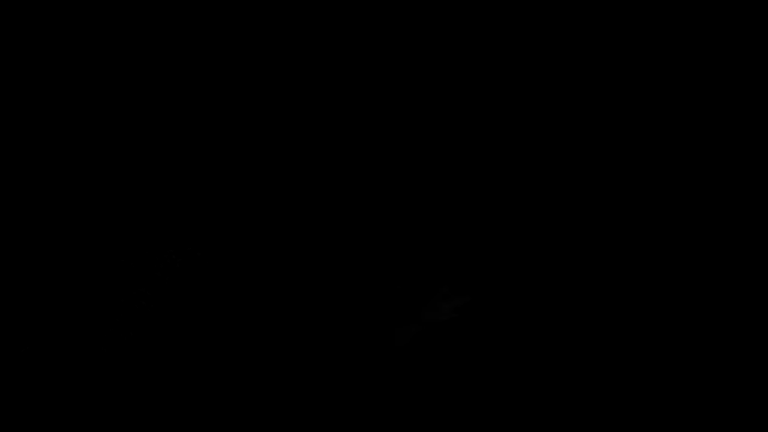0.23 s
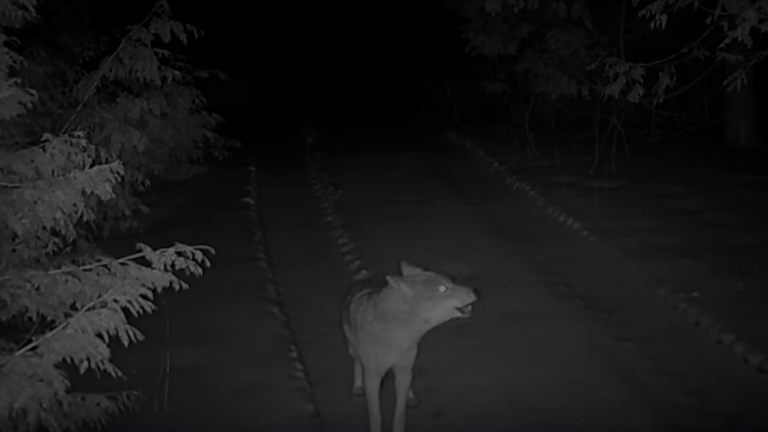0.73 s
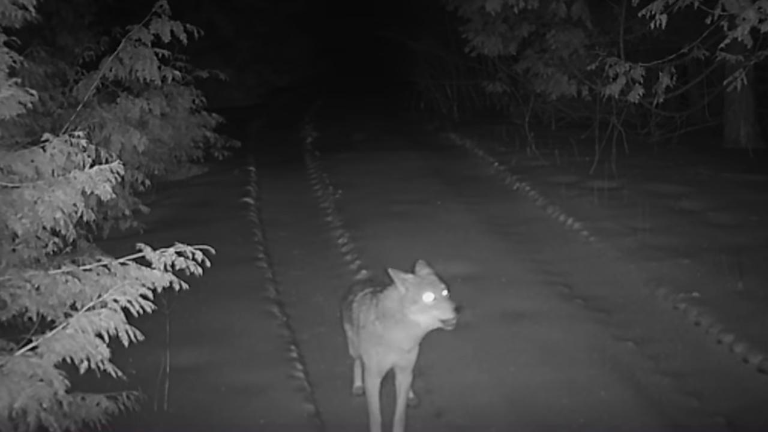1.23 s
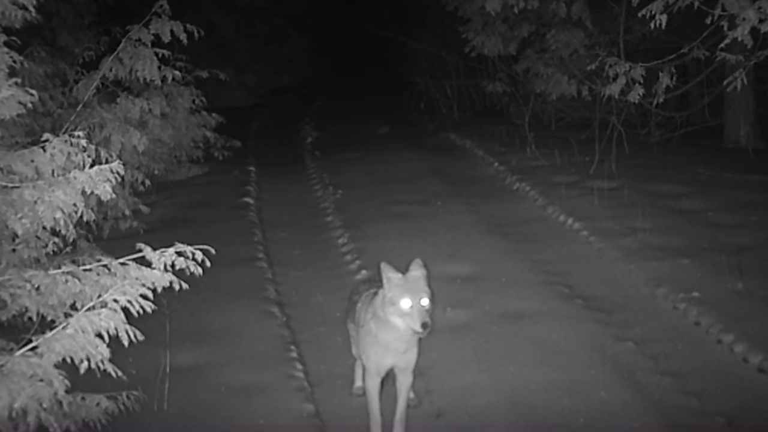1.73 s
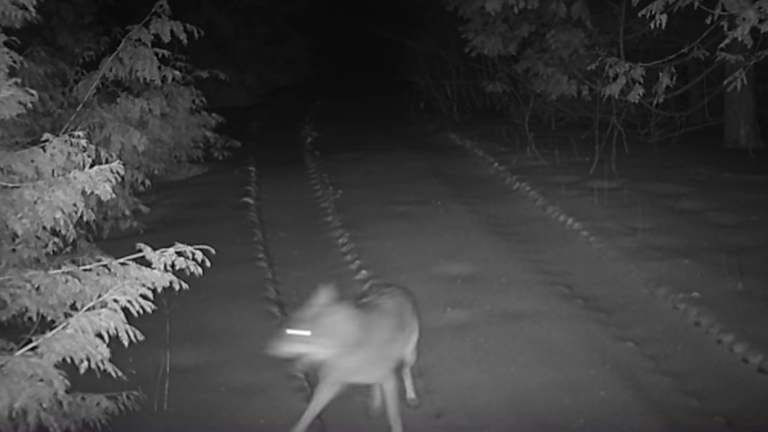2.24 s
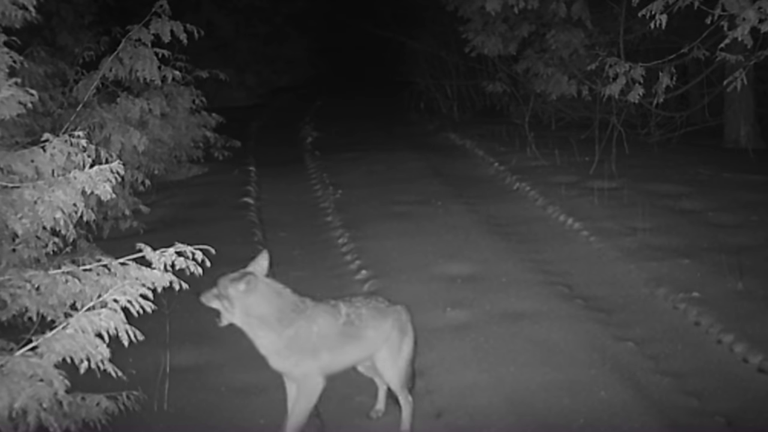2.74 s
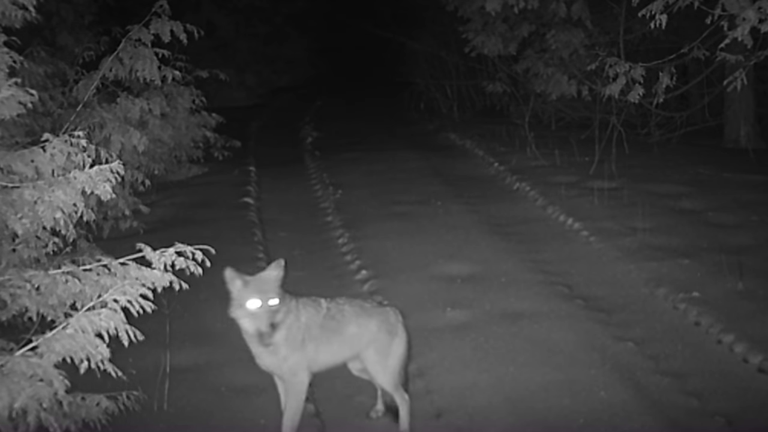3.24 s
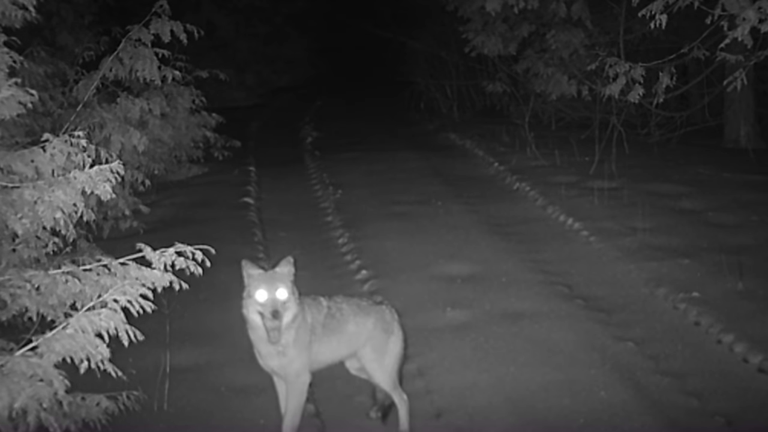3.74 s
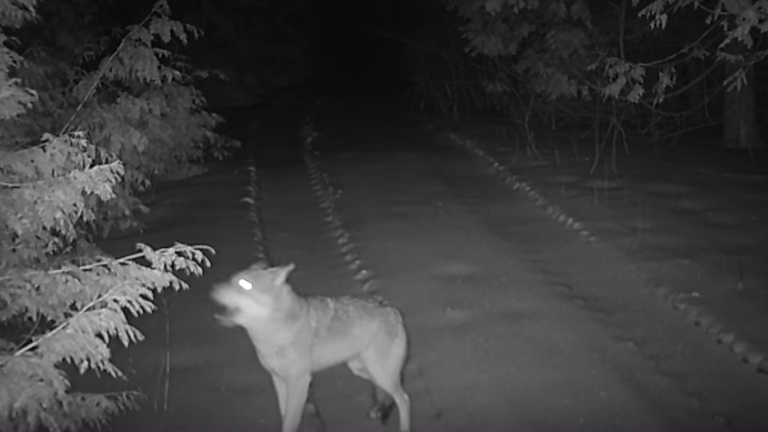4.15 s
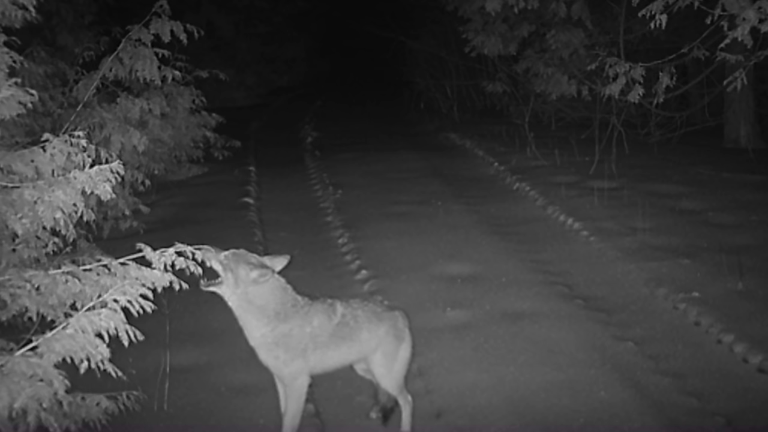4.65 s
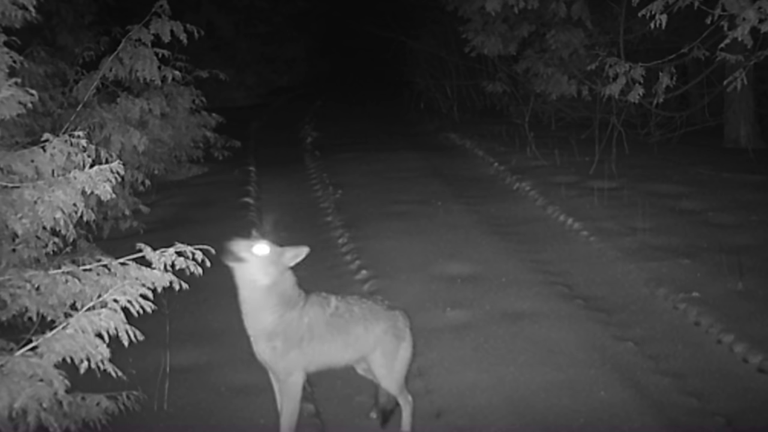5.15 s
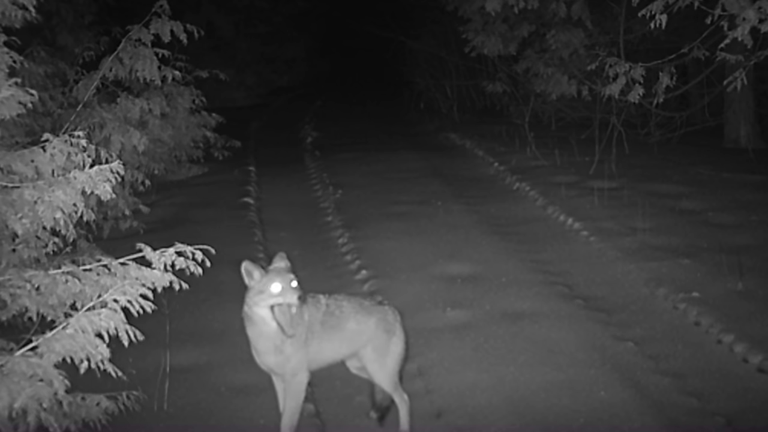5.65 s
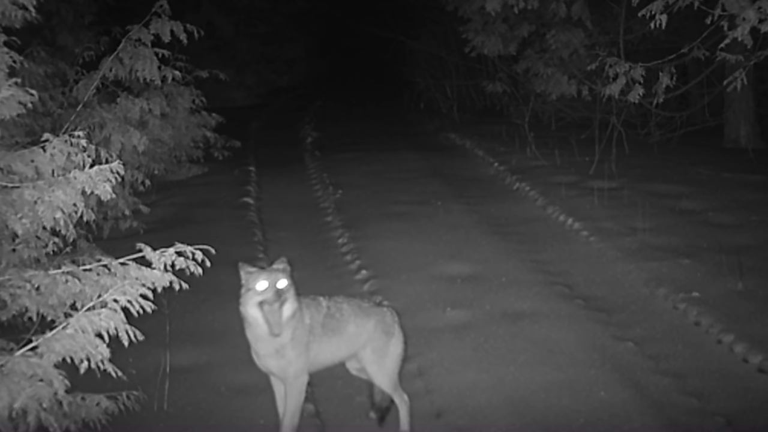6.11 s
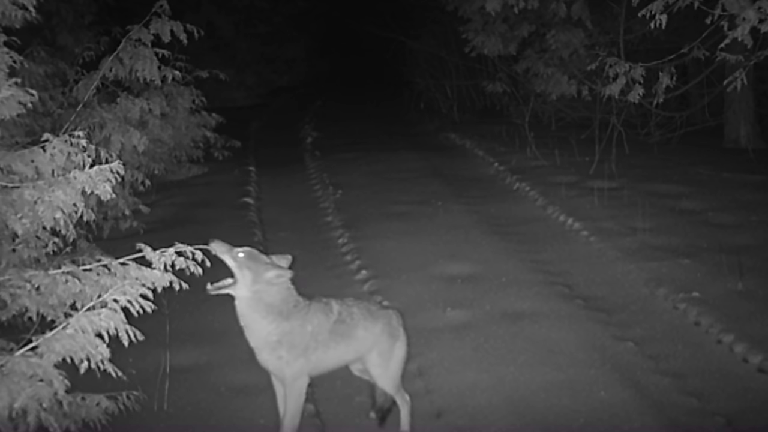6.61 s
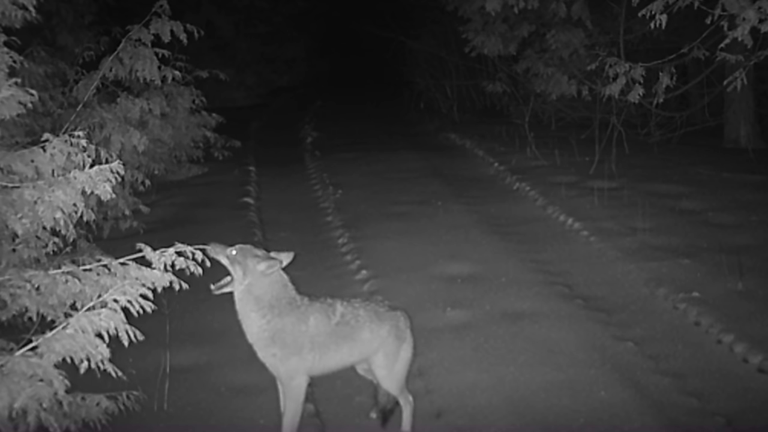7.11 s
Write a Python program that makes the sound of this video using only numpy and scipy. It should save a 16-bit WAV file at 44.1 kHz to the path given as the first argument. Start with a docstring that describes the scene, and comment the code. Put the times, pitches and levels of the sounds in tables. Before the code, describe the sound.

Several coyotes howl quietly some way off in the woods at night, their pitches gliding and overlapping above a faint steady hiss. The chorus thickens and swells with wails, short high yips, hoarse barks and rising whoops, the distant calls smeared by a short echo. Late on, a coyote near the microphone screams, loud and piercing with a thin whistling edge, and yelps once. The pack keeps yipping and barking behind it.

```python
"""Coyote pack, snowy forest at night.

One near animal screams with a second, whistling tone and drives a limiter; behind it the pack howls,
whoops, yodels, yips and barks. Each voice is a gliding stack of harmonics through throat resonances;
barks are uneven slaps of the vocal folds. Trunk echoes smear the far voices, over a faint hiss."""
import sys
import numpy as np
from scipy import signal
from scipy.fft import rfft, irfft
from scipy.io import wavfile
from scipy.ndimage import uniform_filter1d, minimum_filter1d

SR = 44100
rng = np.random.default_rng(int(sys.argv[2]) if len(sys.argv) > 2 else 0)


def to_wav(sig):
    """Store sig (one row per channel, or 1-D mono) as 16-bit WAV at the path in sys.argv[1].

    Samples outside -1..1 are clipped; the rate is SR.
    """
    pcm = np.clip(np.atleast_2d(sig), -1, 1) * 32767
    pcm = np.round(pcm).astype(np.int16)
    wavfile.write(sys.argv[1], SR, pcm.T)  # frames by channels


N = 325458
TIME_S = np.arange(N) / SR
TOP_HZ = 15700

# Call levels are before mix gains.
# Calls, moving mouth: (time [s], pitch [Hz], fundamental [dB], second harmonic [dB])
NEAR_SCREAM = [(5.205, 1604, -12, -24), (5.273, 1722, -26.5, -29), (5.441, 1679, -24.5, -28),
               (5.579, 1870, -26.5, -28), (5.701, 1688, -22, -26), (5.767, 1779, -27.5, -26.5),
               (5.857, 1654, -22.5, -24.5), (5.935, 1818, -25, -34), (5.989, 1853, -16, -19.5),
               (6.015, 1710, -24, -30), (6.04, 1365, -26, -52)]
WAIL_PHRASES = [
    [(0.024, 930, -68, -60), (0.038, 923, -59, -57), (0.358, 907, -59, -57.5), (0.722, 822.8, -56, -55),
     (0.76, 815.4, -69, -53)],
    [(2.76, 1069, -38, -48.5), (2.83, 979.1, -42, -43.5), (2.854, 938.2, -45, -36.5),
     (2.904, 815, -35, -31), (2.912, 880, -46, -37)],
    [(2.914, 910, -39, -31), (2.956, 895.5, -45, -26), (3.118, 793.5, -46.5, -26), (3.226, 799, -47, -27.5),
     (3.259, 780, -37, -33)],
]  # one list per register
WAIL_TAIL = [(3.26, 746.7, -37.5, -32.5), (3.432, 932.7, -36, -44.5), (3.638, 1001, -38.5, -52.5),
             (3.73, 836.4, -45.5, -32.5), (3.836, 688.8, -42, -42.5), (3.86, 617.5, -45, -48)]
HIGH_YODEL = [(1.97, 1042, -41.5, -43.5), (2.042, 1556, -38, -51.5), (2.09, 1648, -45.5, -52),
              (2.154, 1534, -32.5, -57), (2.282, 1736, -36.5, -43), (2.368, 1491, -46.5, -75),
              (2.386, 1342, -39, -61), (2.486, 1193, -41, -54), (2.756, 1324, -45, -54.5),
              (2.8, 1151, -47, -49)]
# Calls, steady mouth: (time [s], pitch [Hz], level [dB])
NEAR_YELP = [(6.233, 1270, -22.5), (6.26, 1600, -16), (6.285, 1798, -8), (6.342, 1704, -13),
             (6.38, 1540, -29)]
HELD_HOWL_A = [(0.024, 487, -51), (0.354, 498, -50.5), (0.602, 471.4, -57), (1.05, 486, -55.5),
               (1.394, 453, -63), (1.51, 453.2, -68)]
HELD_HOWL_B = [(2.2, 519, -54), (2.328, 526, -54), (2.418, 552, -58), (2.72, 519, -50.5)]
LOW_HOWL_HEAD = [(0.55, 497, -61.5), (0.71, 548.3, -47.5), (0.91, 478.4, -55), (1.15, 670, -40),
                 (1.3, 608.3, -37.5), (1.46, 655, -35), (1.62, 664.4, -35), (1.82, 538.2, -38.5),
                 (1.96, 549.7, -35.5), (2.11, 514, -42), (2.22, 450.4, -47.5), (2.55, 450.6, -48.5),
                 (2.61, 473.6, -43.5), (2.97, 438.4, -47)]
LOW_HOWL_TAIL = [(2.97, 510, -38.5), (3.21, 523, -37), (3.348, 657, -43), (3.83, 610, -49), (3.9, 609, -40)]  # after an upward voice break
SOFT_MOANS = [
    [(3.9, 586.5, -42.5), (4.15, 678.6, -46), (4.298, 619.8, -48.5), (4.412, 755.4, -60),
     (4.51, 731.9, -41), (4.548, 844.3, -48.5), (4.63, 814.8, -45.5)],
    [(6.05, 623.4, -55), (6.098, 596.9, -52), (6.2, 698.0, -49.5), (6.328, 564.7, -59),
     (6.402, 685.2, -40.5), (6.484, 821.6, -38), (6.56, 638.6, -58)],
]  # one list per moan
WHOOP_SHORT = [(4.72, 780, -30), (4.764, 1322, -24.5), (4.83, 1492, -33), (4.884, 1286, -35.5),
               (5.014, 1593, -22.5), (5.05, 1330, -27), (5.08, 900, -44)]
WHOOP_LONG = [(5.15, 1026, -26.5), (5.182, 1275, -18), (5.258, 1323, -19), (5.328, 1006, -34.5),
              (5.456, 1380, -12.5), (5.5, 1263, -19.5), (5.542, 916.6, -31.5), (5.758, 973, -31),
              (5.85, 815, -39), (6.02, 838, -44.5)]
WHOOP_HOARSE = [(6.88, 841.5, -30), (6.978, 1138, -25), (7.056, 918.8, -36), (7.122, 958.2, -33),
                (7.19, 1295, -27.5), (7.244, 1236, -28), (7.29, 693, -45.5)]
# Wavering howls: (start [s], length [s], first pitch [Hz], last pitch [Hz], slur [ratio], level [dB])
FAR_WARBLES = [(0.628, 1.77, 1422, 1295, 0.36, -52), (3.851, 1.3, 1438, 1298, 0.21, -44.5),
               (4.083, 0.21, 1274, 1327, 0.0046, -44.5), (6.372, 0.47, 1542, 1168, 0.0016, -45),
               (7.104, .28, 1455, 1481, 0.12, -44), (7.232, .15, 1183, 1235, 0.1, -43.5)]
# Yips: (start [s], length [s], top pitch [Hz], rise [ratio of top], level [dB], roughness [0-1])
FAR_YIPS = [(0.178, 0.11, 1431, 0.13, -44.5, 0.05), (2.928, 0.12, 1323, .1, -41.5, 0.07),
            (3.097, 0.17, 1360, .09, -42.5, .02), (3.27, 0.14, 1346, 0.077, -38, 0.15),
            (3.549, 0.16, 1341, 0.068, -35.5, 0.11), (3.694, 0.16, 1360, 0.051, -37.5, .07),
            (3.975, .23, 823, .28, -47.5, 0.15), (4.413, 0.12, 1303, 0.047, -33, .09),
            (4.695, 0.13, 1386, 0.033, -36, 0.06), (5.675, .17, 1321, 0.2, -35.5, 0.05),
            (5.977, .15, 1325, 0.18, -35, 0.27), (6.286, 0.13, 1287, 0.13, -35, 0.25),
            (6.454, .15, 1322, 0.18, -38, 0.35), (6.719, .11, 1282, 0.082, -34.5, 0.17),
            (6.943, 0.12, 1466, .23, -30.5, 0.22)]
# Barks: (start [s], length [s], first [Hz], middle [Hz], last [Hz], level [dB], roughness [0-1])
FAR_BARKS = [(.46, 0.15, 290, 501, 548, -56, 0.88), (4.051, 0.14, 559, 651.5, 476, -33.5, 0.5),
             (4.667, 0.13, 314, 604, 687, -46, 0.56), (5.11, 0.13, 359, 456, 445, -39, 0.57),
             (6.722, 0.083, 395, 475, 412, -39.5, 0.85), (6.88, 0.13, 611, 756, 665, -43, 0.8),
             (7.141, 0.13, 387.8, 428.4, 364, -36, 0.26)]
# Throat resonances: (frequency [Hz], gain [dB])
NEAR_EQ = [(3400, -32.5), (5200, -25), (7000, -29), (8800, -40), (10500, -42), (15000, -56)]
CRACK_EQ = [(1200, -19), (3000, 2), (4300, 2), (6500, 1), (8000, -19), (10000, -14.5), (15000, -43)]
PACK_EQ = [(900, -19.5), (1400, 3), (1850, 2.5), (2100, -1), (2400, -5), (2750, -11.5), (3300, -17.5),
           (4300, -22.5), (5500, -8), (6600, -15), (8000, -27), (11000, -33), (15000, -58)]
WAIL_EQ = [(2300, -6.5), (2500, -54), (2850, -14), (3300, -37.5), (4200, -36.5), (5700, -20), (7400, -41),
           (9000, -41), (15000, -65)]
ROUND_MOUTH_EQ = [(900, -4.5), (1090, -3), (1230, -12), (1350, -12), (1620, -25.5), (1950, -13),
                  (2200, -33.5), (2650, -34), (3300, -41), (4600, -35), (5300, -19.5), (6000, -19),
                  (6600, -33), (8000, -44.5), (15000, -71)]
BARK_EQ = [(450, -42.5), (800, -7.5), (1350, -2), (2000, -4.5), (2700, -8), (3500, -28), (5500, -31),
           (8000, -43.5), (15000, -54)]
# Trunk echo and night hiss spectra: (frequency [Hz], gain [dB])
ECHO_EQ = [(600, 3), (1300, 6.5), (1750, 2), (2700, 7.5), (5500, 8), (8000, 7), (15000, -17.5)]
HISS_EQ = [(30, -28), (300, -12), (800, -5), (1300, 7), (2050, -4), (2700, 0), (3500, -6), (5500, 10.5),
           (8000, -14), (15000, -12)]


def near_coyote():
    """A scream swoops up, cracks to a quarter of its pitch, bursts out and settles; then one yelp."""
    accent_db, accent_s = 18.5, .035
    swoop = arch(5.131, .11, 1000, 1750, 2050, -19.5)
    crack = arch(5.165, .09, 400, 425, 435, -49, sag_db=12)
    time_s, pitch_hz, first_db, second_db = np.transpose(NEAR_SCREAM)
    burst_db = accent_db * np.exp((time_s[0] - time_s) / accent_s)
    scream = np.column_stack([time_s, pitch_hz, first_db + burst_db, second_db])
    return (voice([swoop], PACK_EQ, bright_db=-4, tilt_db_oct=-2, rough=.3)
            + voice([crack], CRACK_EQ, bright_db=4, tilt_db_oct=5, rough=.037, jitter=.007)
            + voice([scream], NEAR_EQ, bright_db=7, tilt_db_oct=-3, rough=.016, jitter=.003)
            + whistle()
            + voice([NEAR_YELP], NEAR_EQ, bright_db=4.5, tilt_db_oct=.5, rough=.032, jitter=.003))


def whistle(start_s=5.62, end_s=6.04, pitch_ratio=4.335, level_db=-37, sideband=.39, octave_db=-13):
    """A second oscillator in the screaming throat; the folds chop it into sidebands."""
    time_s, pitch_hz, *_ = np.transpose(NEAR_SCREAM)
    at, t, gate = span(start_s, end_s, edge_s=.021)
    fold_phase = 2 * np.pi * np.cumsum(glide(t, time_s, pitch_hz)) / SR
    phase = pitch_ratio * fold_phase + .25 * wander(len(t), 500)
    chop = 1 + 2 * sideband * np.cos(fold_phase) + 2 * sideband ** 2 * np.cos(2 * fold_phase)
    flutter_db = 3 * wander(len(t), 22)
    tone = chop * np.sin(phase) + undb(octave_db) * np.sin(2 * phase)
    out = np.zeros(N)
    out[at] = gate * undb(level_db + flutter_db) * tone
    return out


def howlers():
    """Mid-distance animals: howls, moans, wails, whoops."""
    return (voice([HELD_HOWL_A], PACK_EQ, bright_db=-.5, tilt_db_oct=-16.5, rough=.012)
            + voice([HELD_HOWL_B], PACK_EQ, bright_db=9, tilt_db_oct=-35, rough=.012)
            + voice([LOW_HOWL_HEAD], ROUND_MOUTH_EQ, bright_db=3.5, tilt_db_oct=-1, rough=.012)
            + voice([LOW_HOWL_TAIL], ROUND_MOUTH_EQ, bright_db=-11, tilt_db_oct=-1, rough=.012)
            + voice(SOFT_MOANS, PACK_EQ, bright_db=-8, tilt_db_oct=0, rough=.066)
            + voice(WAIL_PHRASES[:1], WAIL_EQ, bright_db=9.5, tilt_db_oct=1, rough=.036)
            + voice([*WAIL_PHRASES[1:], WAIL_TAIL], WAIL_EQ, bright_db=3.5, tilt_db_oct=-1, rough=.02)
            + voice([scooped(WHOOP_SHORT)], PACK_EQ, bright_db=-10, tilt_db_oct=-3.5, rough=.13)
            + voice([scooped(WHOOP_LONG)], PACK_EQ, bright_db=-6, tilt_db_oct=-10.5, rough=.081)
            + voice([scooped(WHOOP_HOARSE)], PACK_EQ, bright_db=-13, tilt_db_oct=-1, rough=.24))


def scooped(call, from_hz=390, scoop_s=.065, rise_db=33.5):
    """Prepend a low, soft start that swoops up into the call."""
    start_s, _, level_db = call[0]
    return [(start_s - scoop_s, from_hz, level_db - rise_db), *call]


def far_pack():
    """Animals among the trees: yodel, warbles, yips, barks."""
    yodel = undb(-3) * voice([HIGH_YODEL], PACK_EQ, bright_db=-10, tilt_db_oct=.5, rough=.011)
    calls = [warble(*row) for row in FAR_WARBLES]
    warbles = voice(calls, PACK_EQ, bright_db=-.5, tilt_db_oct=-6, rough=.064)
    return yodel + warbles + yips() + barks()


def warble(start_s, length_s, first_hz, last_hz, slur, level_db):
    """Call rows: slur up with an accent, then drift and waver, louder on each crest."""
    rate_hz, depth, swell_db, crest_s = 4.6, .0254, 2.5, .0494
    accent_db, accent_s, slur_s = 7, .13, .056
    t = np.linspace(0, length_s, 100)
    waver = np.cos(2 * np.pi * rate_hz * (t - crest_s))
    onset = np.exp(-(t / slur_s) ** 2)
    drift_hz = np.interp(t, [0, length_s], [first_hz, last_hz])
    pitch_hz = drift_hz * (1 + depth * waver - slur * onset)
    attack_db = accent_db * (np.exp(-t / accent_s) - onset)
    return np.column_stack([start_s + t, pitch_hz, level_db + attack_db + swell_db * waver])


def yips(fall_ratio=1.4):
    """Short, high pitch arches that fall further than they rise."""
    out = np.zeros(N)
    for start_s, length_s, top_hz, rise, level_db, rough in FAR_YIPS:
        first_hz, last_hz = top_hz * (1 - rise), top_hz * (1 - fall_ratio * rise)
        call = arch(start_s, length_s, first_hz, top_hz, last_hz, level_db)
        out += voice([call], PACK_EQ, bright_db=-4, tilt_db_oct=-5.5, rough=rough)
    return out


def barks(rasp=.035, air_gain=.03):
    """The folds slap unevenly; each slap and its puff of air ring the open throat."""
    out = np.zeros(N)
    for *shape, rough in FAR_BARKS:
        time_s, pitch_hz, level_db = arch(*shape).T
        at, t, gate = span(time_s[0], time_s[-1])
        n = len(t)
        hz = glide(t, time_s, pitch_hz) * (1 + rough * rasp * wander(n, 300))
        cycle = np.cumsum(hz) / SR % 1
        slaps = (np.diff(cycle, prepend=0) < 0) * undb(rough * 5.8 * wander(n, 300))
        puffs = rough * air_gain * (1 - cycle) * rng.standard_normal(n)
        bark = shaped(slaps + puffs, [(250, -72)] + BARK_EQ)
        out[at] += gate * undb(glide(t, time_s, level_db)) * bark / bark.std()
    return out


def voice(calls, throat_eq, bright_db, tilt_db_oct, rough, jitter=.0034, rasp=.092):
    """Fold harmonics through a throat; roughness shakes pitch and level and adds turbulent air."""
    flutter_db, flutter_hz, air_db = 5, 19.76, 8.5
    out = np.zeros(N)
    for call in calls:
        time_s, pitch_hz, first_db, *second_db = np.transpose(call)
        at, t, gate = span(time_s[0], time_s[-1])
        n = len(t)
        hz = glide(t, time_s, pitch_hz) * (1 + jitter * wander(n, 70) + rough * rasp * wander(n, 600))
        phase = 2 * np.pi * np.cumsum(hz) / SR
        first = undb(glide(t, time_s, first_db))
        if second_db:
            second = undb(glide(t, time_s, second_db[0]))
            effort = np.hypot(first, second) * undb(bright_db)
        else:
            effort = first * undb(bright_db)
            second = effort * eq_gain(2 * hz, throat_eq)
        tone = first * np.sin(phase) + second * np.sin(2 * phase)
        for k in range(3, int(TOP_HZ / np.median(hz)) + 2):
            # each overtone wavers randomly in level, as if arriving by several paths
            overtone_db = tilt_db_oct * np.log2(k / 2) + flutter_db * wander(n, flutter_hz)
            gain = effort * eq_gain(k * hz, throat_eq) * undb(overtone_db)
            tone += gain * (k * hz < SR / 2) * np.sin(k * phase)
        puffs = rng.standard_normal(n) * (1 + np.cos(phase))
        air = undb(air_db) * rough * effort * shaped(puffs, [(350, -89.5)] + throat_eq)
        shimmer = 1 + rough * .5 * wander(n, 400)
        out[at] += np.sqrt(2) * gate * (tone * shimmer + air)
    return out


def arch(start_s, length_s, first_hz, middle_hz, last_hz, level_db, sag_db=11):
    """Rows (time [s], pitch [Hz], level [dB]) of a short, curved call, loudest midway."""
    u = np.linspace(0, 1, 20)
    sag = (2 * u - 1) ** 2
    pitch_hz = middle_hz + (np.where(u < .5, first_hz, last_hz) - middle_hz) * sag
    return np.column_stack([start_s + length_s * u, pitch_hz, level_db - sag_db * sag])


def glide(t, time_s, values, ease_s=.008):
    """Cubic control curve; throat inertia rounds its crests and troughs."""
    step_s = np.diff(time_s)
    slope = np.diff(values) / np.maximum(step_s, 1e-4)
    before, after = np.r_[slope[0], slope], np.r_[slope, slope[-1]]
    knot_slope = (before * abs(after) + abs(before) * after) / (abs(before) + abs(after) + 1e-9)
    k = np.clip(np.searchsorted(time_s, t) - 1, 0, len(time_s) - 2)
    u = np.interp(t, time_s, np.arange(len(time_s))) - k
    bend = (knot_slope[k] - slope[k]) * (1 - u) - (knot_slope[k + 1] - slope[k]) * u
    curve = np.interp(t, time_s, values) + step_s[k] * u * (1 - u) * bend
    return uniform_filter1d(curve, int(ease_s * SR), mode="nearest")


def span(start_s, end_s, edge_s=.012):
    """Sample indices, times and soft gate of a call."""
    at = np.flatnonzero((TIME_S > start_s - edge_s / 2) & (TIME_S < end_s + edge_s / 2))
    t = TIME_S[at]
    ramp = np.clip(np.minimum(t - start_s, end_s - t) / edge_s + .5, 0, 1)
    return at, t, np.sin(np.pi / 2 * ramp) ** 2


def wander(n, rate_hz):
    """Smooth motion through unit-spread random knots."""
    at = np.arange(n) * rate_hz / SR
    knots = rng.standard_normal(int(n * rate_hz / SR) + 4)
    k = at.astype(int)
    return knots[k] + (knots[k + 1] - knots[k]) * (1 - np.cos(np.pi * (at - k))) / 2


def undb(db):
    """Decibels to gain."""
    return 10 ** (np.asarray(db) / 20)


def eq_gain(hz, eq):
    """Linear gain of an EQ table at hz."""
    knot_hz, knot_db = np.transpose(eq)
    return undb(np.interp(np.log(hz + 1), np.log(knot_hz), knot_db))


def shaped(x, eq):
    """Filter by an EQ table."""
    return irfft(rfft(x) * eq_gain(np.fft.rfftfreq(len(x), 1 / SR), eq), len(x))


def forest_echo(x, trunks=260, t60_s=.65):
    """Trunks throw the calls back, ever later and weaker; snow swallows the lows."""
    delay_s = rng.uniform(.012, t60_s, trunks)
    tail = np.zeros(SR)
    tail[(delay_s * SR).astype(int)] = rng.standard_normal(trunks) * undb(-60 * delay_s / t60_s)
    tail = shaped(tail, ECHO_EQ)
    return signal.fftconvolve(x, tail / np.linalg.norm(tail))[:N]


def night_hiss():
    """Faint, steady shaped noise."""
    return undb(-66) * shaped(rng.standard_normal(N), HISS_EQ)


def scene():
    """Three distances, each with its echo send, over hiss; mono."""
    far, middle, near = far_pack(), howlers(), near_coyote()
    echo = forest_echo(undb(-3.5) * far + undb(-17) * middle + undb(-26) * near)
    return (undb(5.5) * far + middle + near + echo + night_hiss())[None]


def record(dry):
    """Fast limiter, with a faint noise flutter while it works; then a low-pass."""
    ceiling, hold_s, flutter_db = .37, .0025, -44
    hold = int(hold_s * SR)
    target_gain = ceiling / np.maximum(np.abs(dry), ceiling)
    gain = uniform_filter1d(minimum_filter1d(target_gain, hold), hold)
    noise = shaped(rng.standard_normal(N), [(300, 9.5), (2000, 12), (12000, 5)])
    flutter = undb(flutter_db) * np.sqrt(np.abs(1 - gain)) * noise
    lowpass = signal.ellip(8, .2, 70, TOP_HZ, fs=SR, output="sos")
    return signal.sosfilt(lowpass, dry * gain + flutter)


dry = scene()
out = record(dry)
to_wav(out)
```